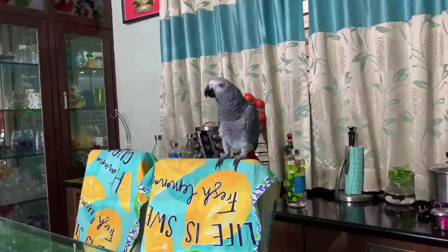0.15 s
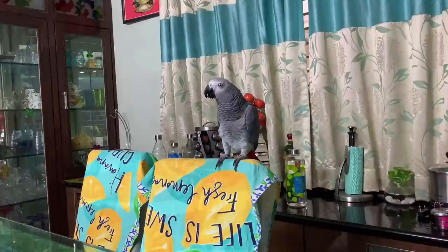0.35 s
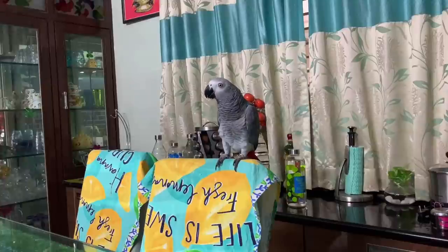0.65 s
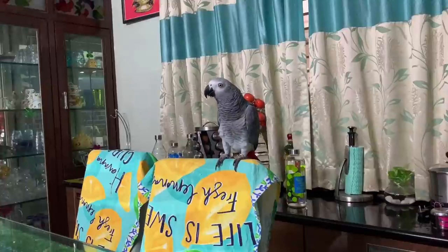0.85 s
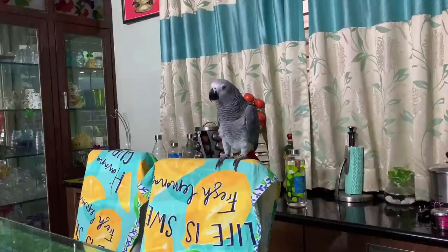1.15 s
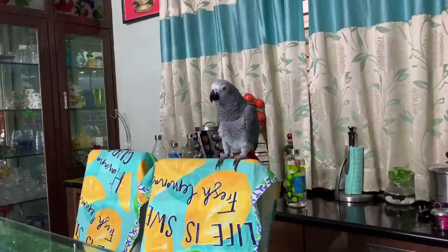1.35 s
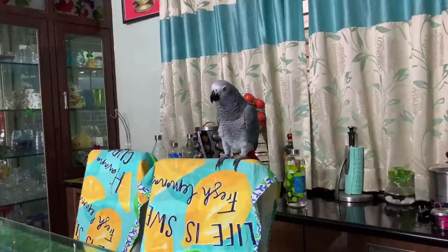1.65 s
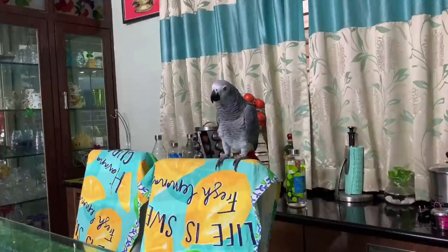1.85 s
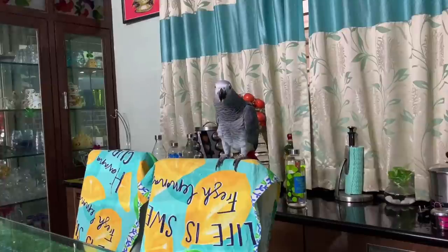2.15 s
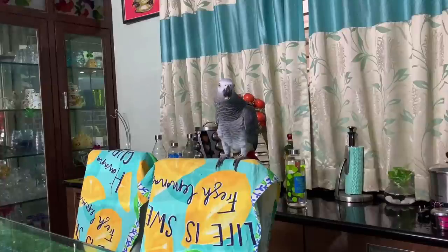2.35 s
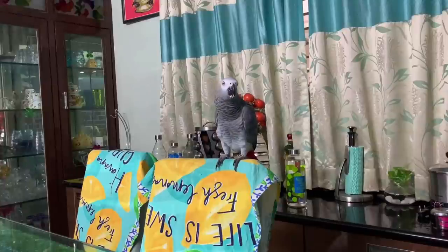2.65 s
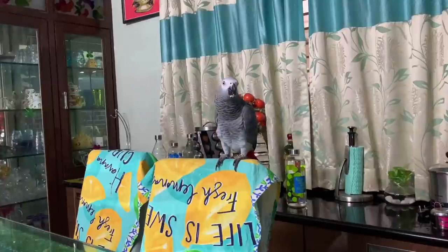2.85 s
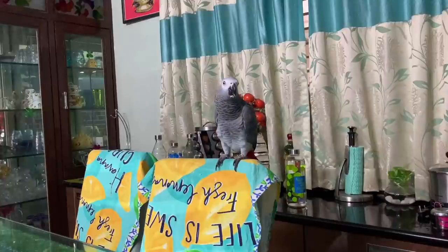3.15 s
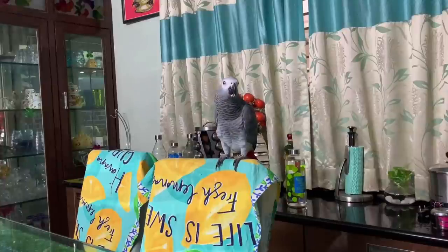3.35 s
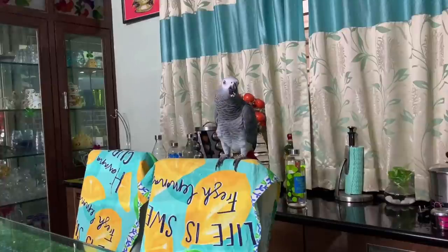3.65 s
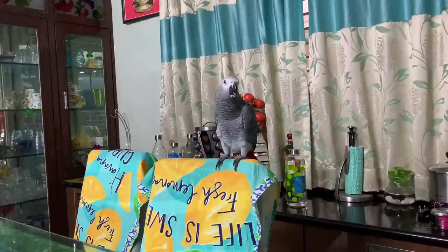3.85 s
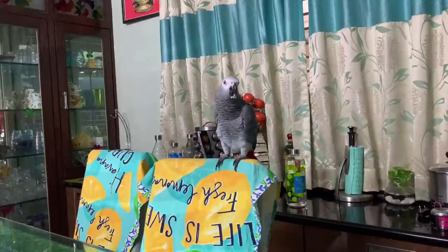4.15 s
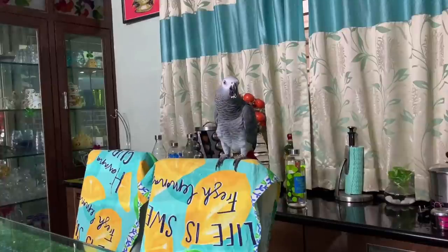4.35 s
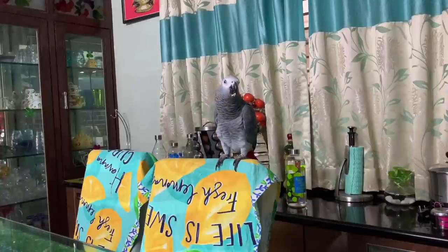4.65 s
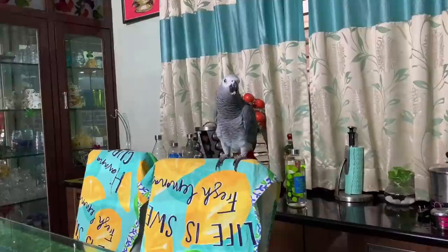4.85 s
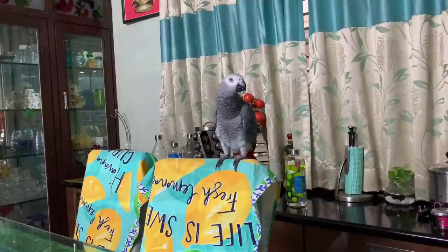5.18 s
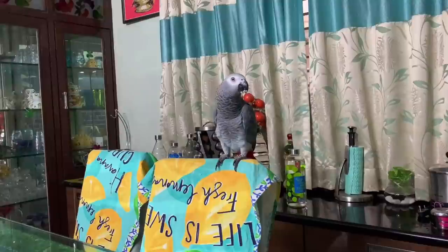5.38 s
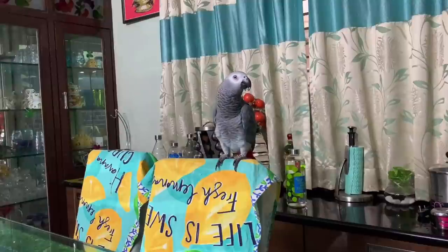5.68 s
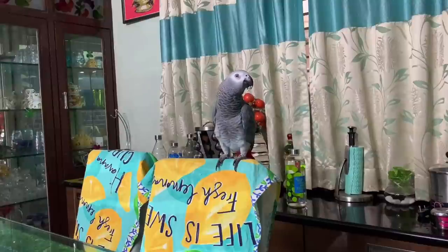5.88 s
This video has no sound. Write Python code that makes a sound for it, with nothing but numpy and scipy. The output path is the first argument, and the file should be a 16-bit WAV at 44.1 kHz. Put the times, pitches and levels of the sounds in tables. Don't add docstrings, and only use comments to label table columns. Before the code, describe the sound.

Stereo microphone a little away from a parrot perched on a chair in a hard-surfaced room. The fading echo of an earlier call opens the scene over gentle hiss and hum. Faint plastic clock ticks come each second. The bird utters one brief clear whistle sliding down, then, nearly three seconds later, a piercing brief squawk with a small woody creak. Both leave a bright room tail, then quiet returns.

```python
import sys
import numpy as np
from scipy import signal
from scipy.fft import rfft, irfft
from scipy.io import wavfile
from scipy.ndimage import uniform_filter1d

SR = 44100
rng = np.random.default_rng(int(sys.argv[2]) if len(sys.argv) > 2 else 0)


def wrap_up_sound(samples):
    columns = np.atleast_2d(samples).T
    tamed = np.clip(columns, -1, 1)
    steps = np.round(tamed * 32767).astype(np.int16)
    wavfile.write(sys.argv[1], SR, steps)


def boost_factor(decibels):
    exponent = np.asarray(decibels, float) / 20
    return 10 ** exponent


N = 265482

# [t/s, pitch f/Hz, effort level/dB, beak opening as overtone level/dB]
WHISTLE = [
    (1.968, 2340, -71.5, -25),
    (1.984, 2293, -32.5, -20.5),
    (2.0, 2200, -27.5, -25.5),
    (2.018, 2082, -20, -33.5),
    (2.036, 2009, -23, 0),
    (2.062, 1994, -34.5, 2),
    (2.1, 1825, -27, 1.5),
    (2.125, 1815, -25, -2.5),
    (2.15, 1813, -41, -21),
]
# [t/s, pitch f/Hz, effort level/dB, beak opening as overtone level/dB]
SQUAWK = [
    (4.858, 4290, -77, 28.5),
    (4.882, 4235, -39.5, 20.5),
    (4.897, 4400, -16.5, 5),
    (4.906, 4188, -17, 7.5),
    (4.93, 4211, -10.5, -5),
    (4.955, 4120, -18.5, 7.5),
    (4.982, 4192, -18, -13),
    (5.002, 4122, -20.5, -2),
    (5.05, 4165, -32, -12.5),
]
# [t/s, level/dB]
SECOND_VOICE = [
    (4.912, -13),
    (4.935, -12),
    (4.99, -17.5),
    (5.035, -19.5),
]
WHISTLE_OVERTONES = [-15, -6, -17, -3, -26.5, -12.5, -20]
SQUAWK_OVERTONES = [-21.5, -33.5]
# [f/Hz, level/dB]
WHISTLE_BREATH = [(150, -9.5), (500, -7.5), (1100, 4.5), (1500, 1.5), (2900, 0), (4700, -20), (7500, 6),
                  (10500, -18), (13500, -13), (15500, -26.5)]
SQUAWK_BREATH = [(300, -14), (900, -19), (2200, -4.5), (3400, -1), (5400, -18), (6500, 4), (7500, -21),
                 (10500, -11.5), (13300, -24), (14200, -53.5)]
# [t/s, level/dB, rattle level/dB]
TICKS = [
    (0.12, -61.5, -2),
    (1.109, -60, 1),
    (2.118, -59.5, -2.5),
    (3.1099, -59.5, -1.5),
    (4.121, -66.5, 4),
    (5.113, -62.5, 1.5),
]
# [f/Hz, level/dB, t60/s]
CLOCK_CASE = [(730, -11.5, 0.0098), (1660, -18, 0.013), (2340, -8.5, 0.007), (3250, -0.5, 0.007),
              (4000, -1.5, 0.0085), (4400, -4, .012), (4790, -3.5, 0.0092), (5800, -2, 0.0034),
              (6800, -11.5, 0.028), (8000, 4.5, 0.0011), (8100, 10.5, 0.0011), (9150, -0.5, 0.0025),
              (9860, -4.5, 0.0017), (13100, -10.5, 0.0016)]
# [left-right level/dB, left lead/ms, room share level/dB, echo length as a factor]
WHISTLE_PLACE = (2.5, .055, -3, 1)
SQUAWK_PLACE = (1, .09, 0, 1.06)
CLOCK_PLACE = (1.1, 0.22, 9.4, 0.69)
# [t/s, level/dB, centre f/Hz, width f/Hz, t60/s]
CLICKS = [
    (0.5633, -64.5, 3700, 1500, 0.02),
    (0.5683, -57.5, 680, 1040, 0.025),
    (0.568, -75, 3780, 1500, 0.0089),
    (0.577, -51.5, 113, 29.6, 0.073),
    (1.108, -59.5, 165, 59.7, 0.16),
    (2.129, -49.5, 194, 147, 0.21),
    (4.55, -62, 6540, 1492, 0.032),
    (4.552, -69.5, 3200, 694, 0.045),
    (4.799, -70, 2430, 707, 0.098),
    (5.471, -57, 12500, 6010, 0.018),
]
# [t/s, peak level/dB, centre f/Hz]
CREAK = [
    (4.78, -60, 644),
    (4.871, -58, 677),
    (4.922, -63.5, 541),
    (5.005, -48, 548),
    (5.071, -64.5, 560),
    (5.19, -67, 575),
]
# [t/s, level/dB]
RUMBLE = [
    (4.72, -92.5),
    (4.8, -64.5),
    (5.15, -68.5),
    (5.25, -85),
]
# [f/Hz, width f/Hz, level at the start/dB, t60/s]
EARLIER_CALL = [
    (1260, 1100, -68.5, 0.81),
    (1630, 410, -63, 0.72),
    (2020, 390, -68, 0.1),
]
# [f/Hz, width f/Hz, level/dB]
HUM = [
    (57, 11, -74.5),
    (110, 13, -68),
    (195.7, 22, -74.5),
    (284.2, 22, -83),
]
# [t/s, peak level/dB]
HUM_SWELL = [(0.01, 4.5), (0.59, 5.5), (1.17, 0.5), (1.34, -2), (1.99, 10.5), (2.481, 7.5), (2.67, -2),
             (3.1, 0), (3.32, 0.5), (4.45, 3), (4.749, 5.5), (5.031, 3.5), (5.328, 9), (5.719, -10.5),
             (6.01, -1)]
# [f/Hz, level/dB per Hz]
HISS = [(20, -34.5), (40, -13.5), (80, -9), (150, -13), (300, -21), (600, -26.5), (1200, -34.5),
        (3000, -37.5), (7000, -41), (10000, -40), (13500, -40), (15000, -50), (16000, -71)]
# [f/Hz, t60/s]
ROOM = [(250, 0.13), (1200, 0.51), (1800, 0.6), (3000, 0.41), (4200, 0.51), (8000, 0.35), (13000, 0.35)]
# [f/Hz, likeness -1..1]
PORT_LIKENESS = [(60, 0.38), (180, 0.76), (550, 0.072), (1650, -0.13), (4970, 0.018), (15000, 0.44)]
# [f/Hz, width f/Hz, level/dB]
PORT_DIPS = [
    (8820, 620, -8),
    (11700, 650, -22.5),
    (16400, 2900, -25.5),
]


def call(rows, overtones_db, breath_colour, extras, wobble, tilt):
    s, *columns = np.transpose(rows)
    t = np.arange(s[0], s[-1], 1 / SR)
    hz, effort_db, beak_db = (np.interp(t, s, c) for c in columns)
    air, half, second = extras(t, beak_db)
    shake = evened(uniform_filter1d(rng.standard_normal((2, N)), 150, axis=1))[:, :len(t)]
    turn = 2 * np.pi * np.cumsum(hz * (1 + wobble * shake[0])) / SR
    beat = 2 * np.pi * np.cumsum(560 * (1 + .13 * shake[1])) / SR
    smear = .7 * shake[1]
    half_lines = np.cos(turn / 2 + smear) * boost_factor(-13)
    half_lines += np.cos(turn * 3 / 2 + smear)
    half_lines += np.cos(turn * 5 / 2) * boost_factor(-31)
    voice = np.cos(turn) + half * half_lines
    open_db = np.maximum(beak_db, -1)
    for k, db in enumerate(overtones_db):
        strength = boost_factor(db + 1.2 * beak_db + tilt * k * open_db)
        voice += strength * np.cos((k + 2) * turn) * (1 + 2 * second * np.cos(beat))
    voice += second * (np.cos(turn + beat) + boost_factor(-15.5) * np.cos(turn - beat))
    breath = evened(coloured(rng.standard_normal(N), breath_colour))[:len(t)]
    edges = signal.windows.tukey(len(t), .08)
    out = np.zeros(N)
    add(out, s[0], boost_factor(effort_db) * (np.sqrt(2) * voice + air * breath) * edges)
    return out


def clean_voice(t, beak_db):
    silent = boost_factor(-70)
    return boost_factor(-16.5 + .85 * beak_db), silent, silent


def strained_voice(t, beak_db):
    fall_db_per_s = 494
    gust = surges(t, [(4.958, -25.5)], 1500, fall_db_per_s, hold_s=.03)
    half = surges(t, [(4.928, -24.5)], 751, fall_db_per_s, hold_s=.055)
    second = surges(t, SECOND_VOICE, rise_db_per_s=483, fall_db_per_s=486)
    return boost_factor(-50) + gust, half, second


def whistle():
    return call(WHISTLE, WHISTLE_OVERTONES, WHISTLE_BREATH, clean_voice, wobble=.003, tilt=.7)


def squawk():
    return call(SQUAWK, SQUAWK_OVERTONES, SQUAWK_BREATH, strained_voice, wobble=.009, tilt=.066)


def clock():
    t, out = np.arange(2500) / SR, np.zeros(N)
    for s, db, rattle_db in TICKS:
        case = np.zeros(len(t))
        for k, (hz, mode_db, t60) in enumerate(CLOCK_CASE):
            vary = rng.uniform(-1, 1)
            ring = np.sin(2 * np.pi * hz * (1 + .015 * vary) * t)
            case += (-1) ** k * boost_factor(mode_db + vary - 60 * t / t60) * ring
        rattle = boost_factor(rattle_db - 7 - 60 * t / .044) * rng.standard_normal(len(t))
        knock = boost_factor(3) * (t == 0)
        add(out, s, boost_factor(db) * signal.fftconvolve(rattle + knock, case))
    return out


def creak():
    t = np.arange(N) / SR
    s, db, hz = np.transpose(CREAK)
    pitch = np.interp(t, s, hz)
    rub = resonate(resonate(rng.standard_normal(N), pitch, 45), pitch, 73)
    slips = surges(t, zip(s, db), rise_db_per_s=595, fall_db_per_s=250.5)
    rumble = resonate(resonate(rng.standard_normal(N), 430, 220), 430, 301.3)
    sway = resonate(resonate(rng.standard_normal(N), 44, 25), 44, 30)
    frame_gain = boost_factor(np.interp(t, *np.transpose(RUMBLE), -200, -200))
    return evened(rub) * slips + (evened(rumble) + boost_factor(1) * evened(sway)) * frame_gain


def clicks():
    t, out = np.arange(6000) / SR, np.zeros(N)
    for s, db, hz, width, t60 in CLICKS:
        puff = evened(resonate(rng.standard_normal(len(t)), hz, width))
        add(out, s, puff * boost_factor(db - 60 * t / t60))
    return out


def earlier_call():
    t, echo = np.arange(N) / SR, np.zeros((2, N))
    for port in echo:
        for hz, width, db, t60 in EARLIER_CALL:
            band = resonate(resonate(rng.standard_normal(N), hz, width), hz, width)
            port += evened(band) * boost_factor(db - 60 * t / t60)
    return echo


def house_hum():
    hum = np.zeros(N)
    for hz, width, db in HUM:
        band = resonate(resonate(rng.standard_normal(N), hz, width), hz, 2 * width)
        hum += boost_factor(db) * evened(band)
    swell = surges(np.arange(N) / SR, HUM_SWELL, rise_db_per_s=94, fall_db_per_s=95.5)
    return hum * (boost_factor(-4.5) + swell)


def microphone_hiss():
    frames, hz = N // 512 + 5, np.fft.rfftfreq(2048, 1 / SR)
    a, b, c, d, patches = rng.standard_normal((frames, len(hz), 5)).T
    patches = uniform_filter1d(uniform_filter1d(patches, 10, axis=0), 8, axis=1)
    same = np.clip(read(PORT_LIKENESS, hz), -1, 1)[:, None]
    left = a + 1j * b
    right = same * left + np.sqrt(1 - same ** 2) * (c + 1j * d)
    z = np.array([left, right]) * boost_factor(.4 * evened(patches)) * boost_factor(read(HISS, hz))[:, None]
    hiss = signal.istft(z, nperseg=2048, noverlap=1536)[1][:, :N]
    return boost_factor(-66) * evened(hiss)


def room_tail(length):
    taps = rng.standard_normal((2, SR)) * (rng.random((2, SR)) < .12)
    taps *= np.clip((np.arange(SR) / SR - .003) / .006, 0, 1)
    hz, t, z = signal.stft(taps, SR, nperseg=256)
    same = np.clip(read(PORT_LIKENESS, hz), 0, 1)[:, None]
    z = np.array([z[0], same * z[0] + np.sqrt(1 - same ** 2) * z[1]])
    decay = boost_factor(-60 * t / (length * read(ROOM, hz)[:, None]))
    tail = signal.istft(z * decay, SR, nperseg=256)[1]
    return tail / np.linalg.norm(tail, axis=1, keepdims=True)


def placed(x, pan_db, lead_ms, room_db, length):
    hz = np.fft.rfftfreq(N, 1 / SR)
    side = np.array([[.5], [-.5]])
    lead = np.exp(2j * np.pi * hz * side * lead_ms / 1000)
    direct = irfft(rfft(x) * boost_factor(pan_db * side) * lead, N)
    echo = signal.fftconvolve(x[None], room_tail(length), axes=1)[:, :N]
    return direct + boost_factor(room_db) * echo


def surges(t, peaks, rise_db_per_s, fall_db_per_s, hold_s=0):
    gain = np.zeros(len(t))
    for s, db in peaks:
        below_db = np.maximum((s - t) * rise_db_per_s, (t - s - hold_s) * fall_db_per_s)
        gain += boost_factor(db - below_db.clip(0))
    return gain


def resonate(x, hz, width):
    turn = np.exp(2j * np.pi * np.cumsum(hz * np.ones(len(x))) / SR)
    r = np.exp(-np.pi * width / SR)
    return 2 * (turn * signal.lfilter([1 - r], [1, -r], x / turn)).real


def coloured(x, table):
    hz = np.fft.rfftfreq(len(x), 1 / SR)
    return irfft(rfft(x) * boost_factor(read(table, hz)), len(x))


def read(points, hz):
    f, value = np.transpose(points)
    return np.interp(np.log(hz + 1), np.log(f + 1), value)


def evened(x):
    return x / np.sqrt(np.mean(x ** 2) + 1e-20)


def add(mix, s, sound):
    part = mix[round(s * SR):][:len(sound)]
    part += sound[:len(part)]


def scene():
    bird = placed(whistle(), *WHISTLE_PLACE) + placed(squawk(), *SQUAWK_PLACE)
    nearby = placed(creak() + clicks(), 0, .032, -5.5, .6)
    background = earlier_call() + house_hum() + microphone_hiss()
    return bird + placed(clock(), *CLOCK_PLACE) + nearby + background


def masked(x, below_db, depth_db, reach_hz):
    hz, t, z = signal.stft(x, SR, nperseg=1024, noverlap=768)
    power = abs(z) ** 2
    smooth = uniform_filter1d(uniform_filter1d(power, 9, axis=1), 5, axis=2)
    power_db = 10 * np.log10(smooth + 1e-20)
    spread = np.exp(-abs(hz[:, None] - hz) / reach_hz)
    mask_db = 10 * np.log10(spread @ power + 1e-20)
    kept_db = -depth_db / (3.5 + np.exp(power_db - mask_db + below_db))
    return signal.istft(z * boost_factor(kept_db), SR, nperseg=1024, noverlap=768)[1][:, :N]


def top_cut(x):
    return signal.sosfilt(signal.butter(12, 15800, fs=SR, output="sos"), x)


def record(dry):
    hz = np.fft.rfftfreq(N, 1 / SR)
    dips_db = sum(db * np.exp(-abs((hz - f) / width * 2) ** 4) for f, width, db in PORT_DIPS)
    picked_up = irfft(rfft(dry) * boost_factor(dips_db), N)
    mix = masked(picked_up, below_db=41, depth_db=25, reach_hz=873)
    return top_cut(mix)


dry = scene()
out = record(dry)
wrap_up_sound(out)
```